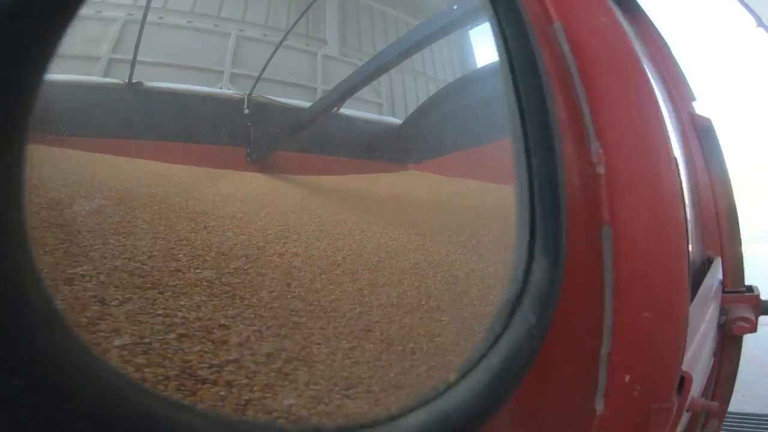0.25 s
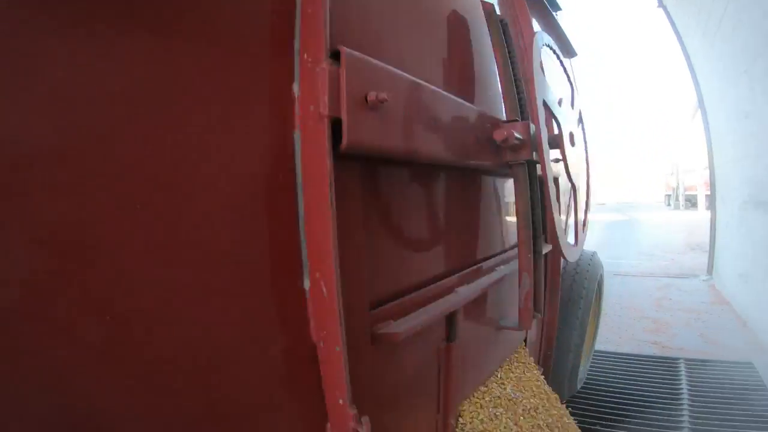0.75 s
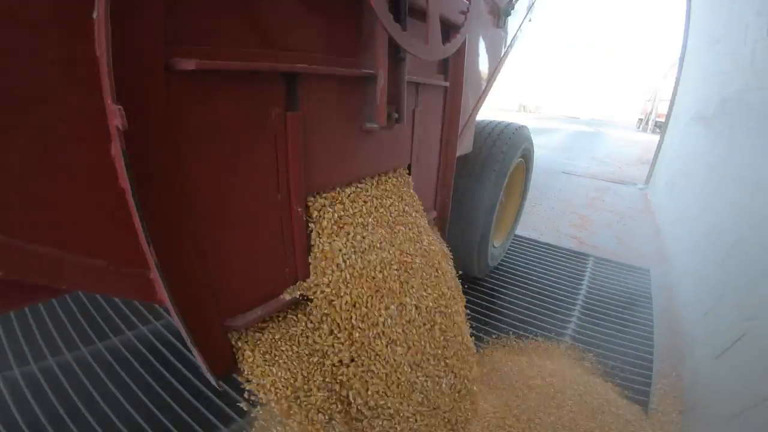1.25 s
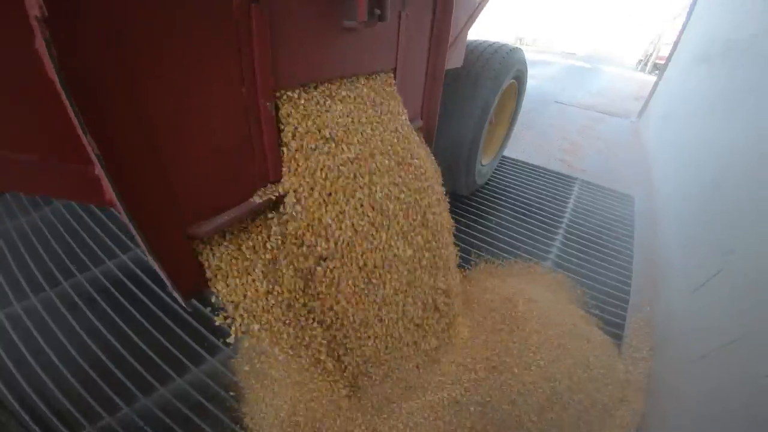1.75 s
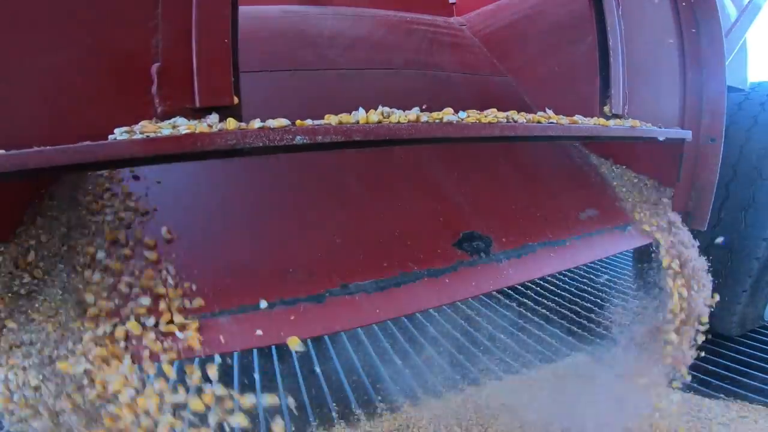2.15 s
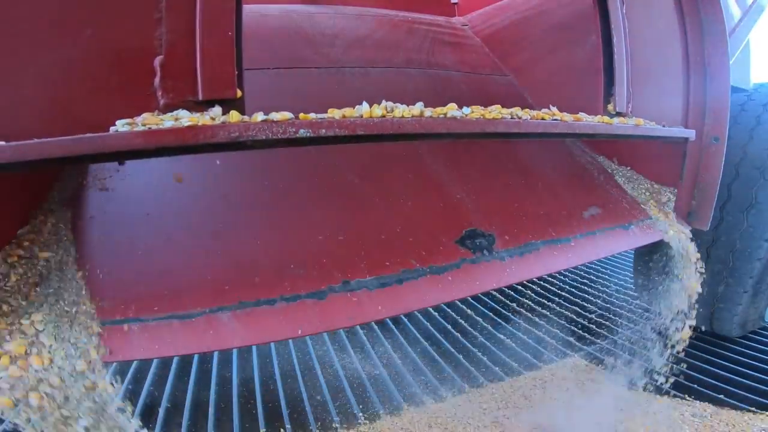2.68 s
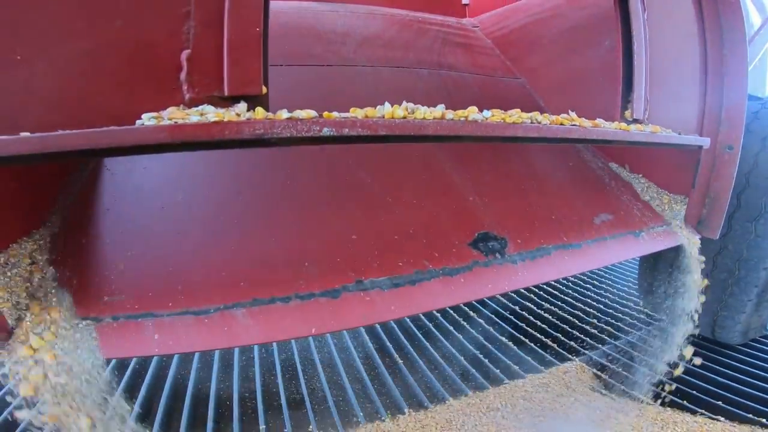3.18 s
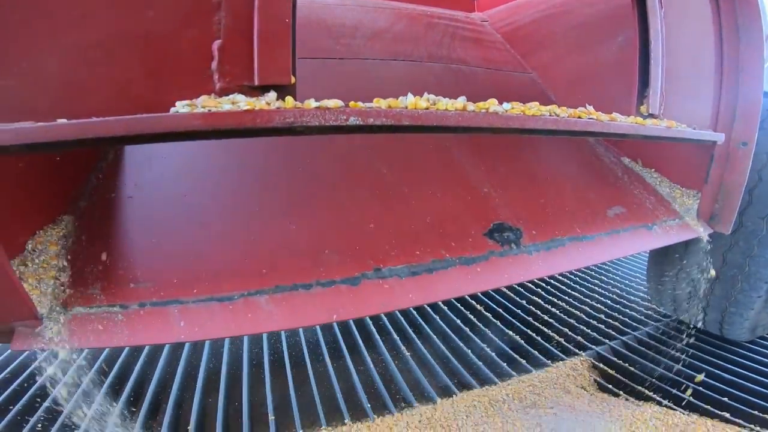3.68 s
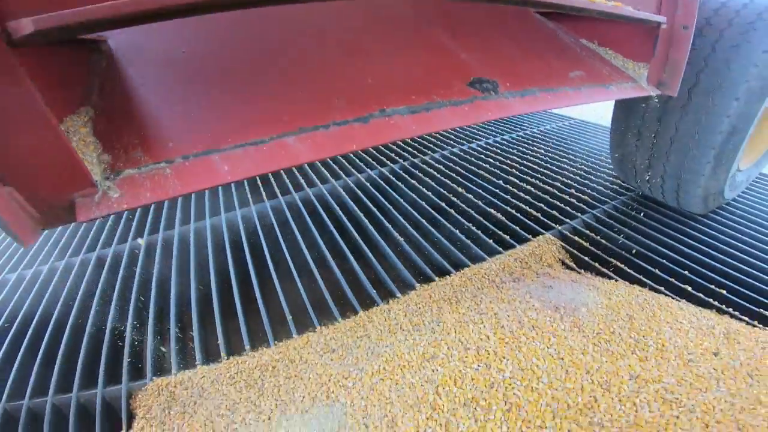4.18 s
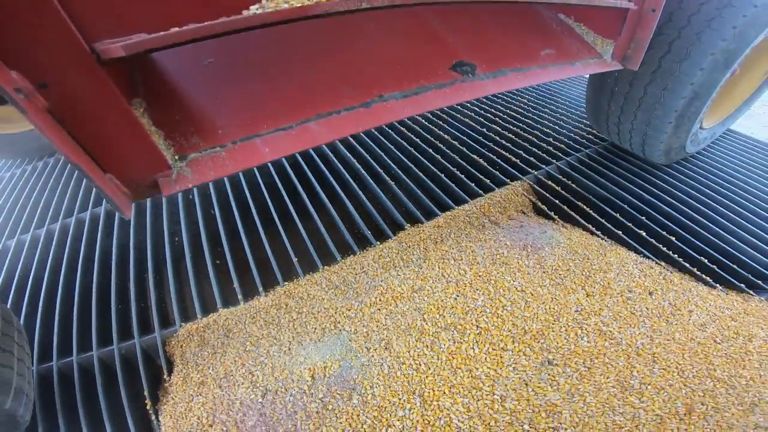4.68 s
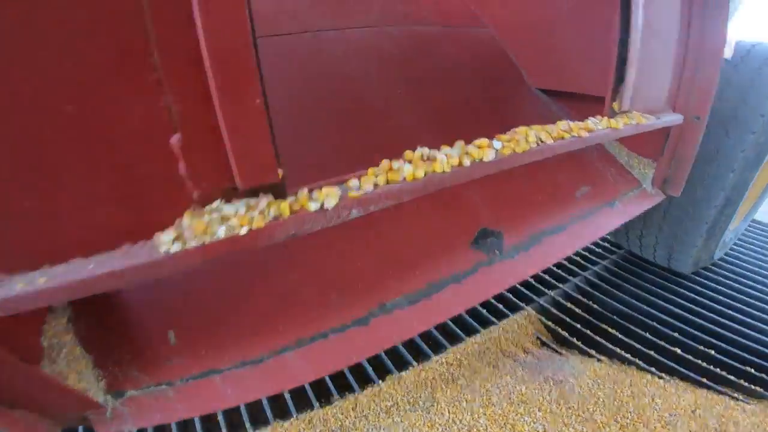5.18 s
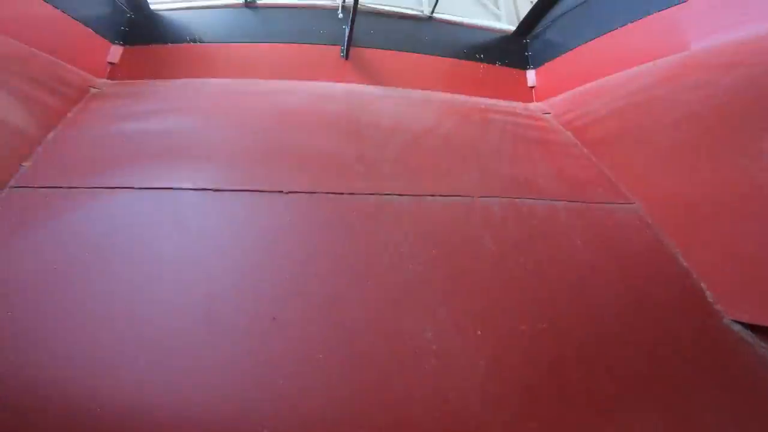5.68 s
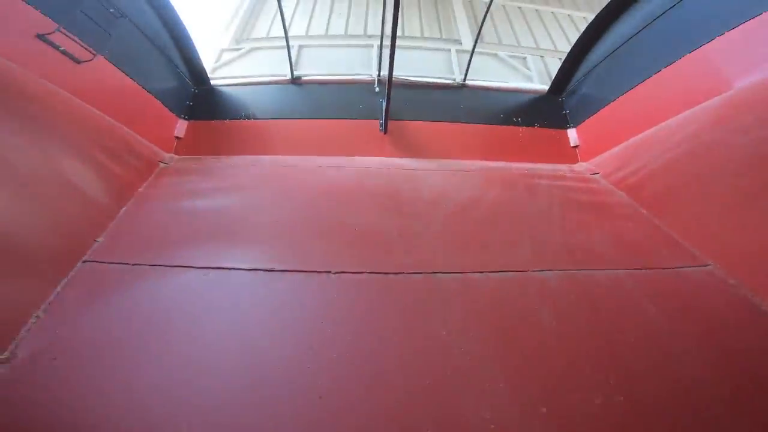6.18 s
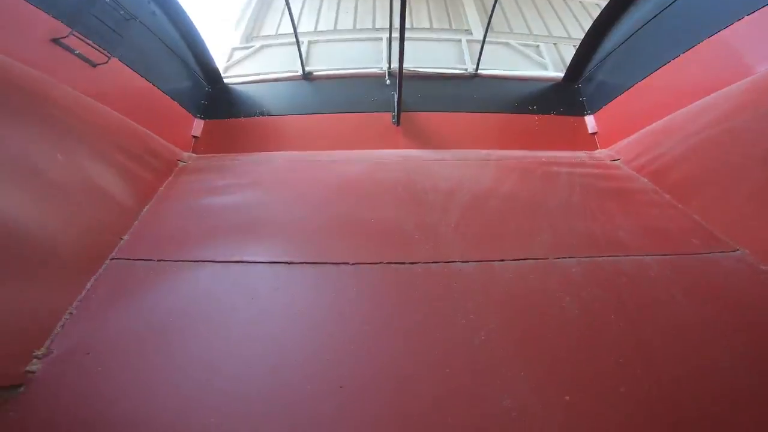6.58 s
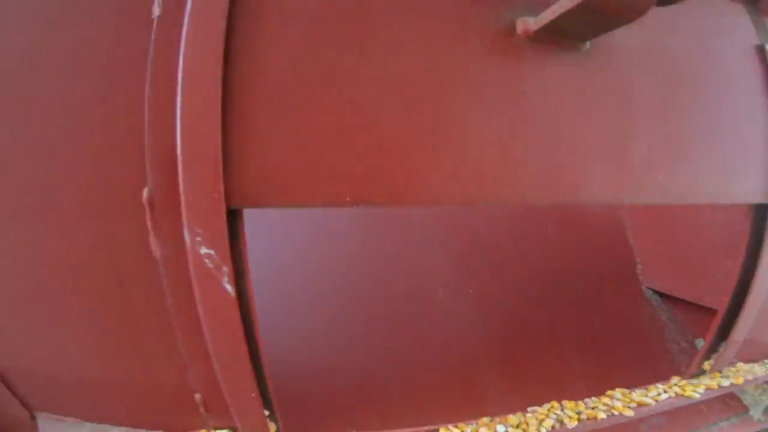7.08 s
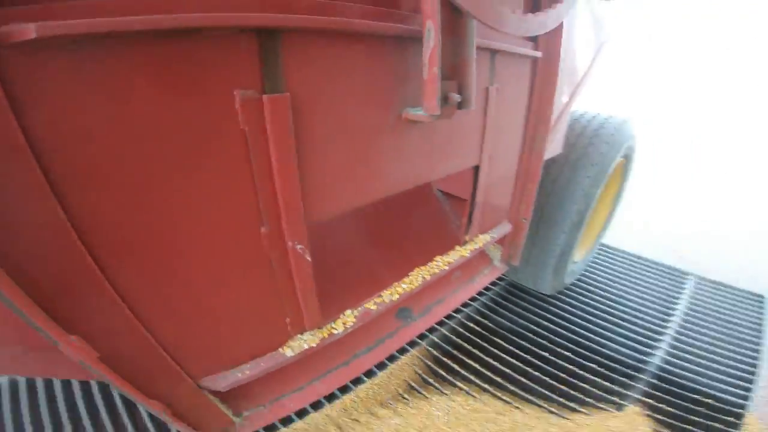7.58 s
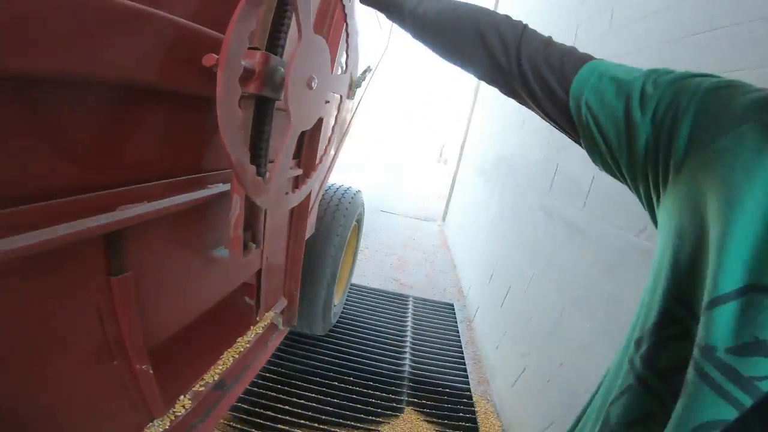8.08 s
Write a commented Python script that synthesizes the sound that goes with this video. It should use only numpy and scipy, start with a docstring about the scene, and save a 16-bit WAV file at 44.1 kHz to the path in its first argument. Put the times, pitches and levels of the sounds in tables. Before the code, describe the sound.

Dense grain rushes and hisses through a floor grate over a loud low conveyor hum, cuts out, returns thin, then cracks and a grinding gate.

```python
"""Grain wagon unloading

Shelled grain pours through a floor grate: dense random taps, coloured into rush, fizz, hiss and a low body.
A conveyor under the pit hums (three sines) and rumbles (shaped noise). After a short hard cut to silence the
pour is thinner under a faint whistle of narrow noise; stray kernels crack and ring the empty hopper, soft
scuffs of noise pass, and the gate grinds as uneven slips and grit excite its resonances.
The sound is mono in the bass and mids and widens in the treble; the loudest peaks clip."""
import sys
import numpy as np
from scipy import signal
from scipy.io import wavfile
from scipy.ndimage import uniform_filter1d

SR = 44100
rng = np.random.default_rng(int(sys.argv[2]) if len(sys.argv) > 2 else 0)


def digitize_waveform(pressure):
    """Quantize a signal to 16-bit integers and store it at the path in sys.argv[1].

    Rows of a 2-D input are taken as channels; values are limited to [-1, 1].
    """
    field = np.atleast_2d(pressure).T
    bounded = np.clip(field, -1, 1)
    quanta = np.round(bounded * 32767).astype(np.int16)
    wavfile.write(sys.argv[1], SR, quanta)


N = 367794
T = np.arange(N) / SR  # s

# Curves in two parts, before and after the cut.
# Conveyor hum where the microphone is, then its rumble and roar: [t/s, level/dB]
HUM_LEVEL = [
    [(0.0, -9), (0.36, -10.5), (0.40, -16), (0.556, -14), (0.64, -6.5), (0.92, -8.5), (0.978, -15.5),
     (1.144, -7), (1.796, -10), (1.87, -17)],
    [(2.12, -9.5), (2.24, -16.5), (2.67, -16), (2.79, -8.5), (3.6, -6.5), (3.97, -9.5), (4.03, -17),
     (4.3, -7.5), (5.32, -8), (5.39, -17), (5.64, -19), (6.52, -19), (7.3, -14), (7.96, -17.5), (8.11, -12),
     (8.34, -20)],
]
RUMBLE_LEVEL = [
    [(0.0, -16), (0.5, -15.5), (0.93, -18.5), (1.68, -19.5)],
    [(2.3, -21.5), (2.65, -22), (2.9, -15.5), (3.78, -16), (4.09, -19.5), (4.58, -16), (5.2, -16),
     (5.42, -22), (5.9, -21), (6.5, -14.5), (6.87, -14.5), (7.2, -18.5), (7.66, -23), (8.1, -22.5)],
]
ROAR_LEVEL = [
    [(0.0, -29), (0.43, -31.5), (0.7, -29.5), (1.68, -31)],
    [(2.3, -38), (2.6, -37), (2.72, -32), (3.4, -33.5), (5.68, -32), (5.93, -29), (6.87, -30), (7.15, -33),
     (7.66, -37), (8.1, -35)],
]
# Grain stream: [t/s, rush level/dB, fizz level/dB]
STREAM_LEVEL = [
    [(0.0, -35, -30), (0.26, -34.5, -29), (0.57, -30.5, -26), (1.15, -28.5, -25.5), (1.4, -28, -28)],
    [(2.3, -41, -46), (2.88, -39.5, -41.5), (3.98, -42, -46), (5.43, -43, -49), (5.93, -36, -48.5),
     (6.19, -40.5, -52.5), (6.94, -41, -50.5), (7.13, -39.5, -57.5), (7.2, -43, -64), (7.92, -46, -61),
     (8.1, -43.5, -58)],
]
# Level of the hiss above about 10 kHz, nearly silent at times: [t/s, level/dB]
HISS_LEVEL = [
    [(0.57, -29.5), (1.39, -33), (1.68, -30)],
    [(2.3, -85.5), (2.88, -74.5), (3.53, -48), (5.03, -52.5), (5.5, -58), (6.0, -54), (7.05, -60.5),
     (7.2, -88)],
]

# Spectral shapes, relative because each is scaled to rms 1 before use.
# Conveyor rumble, boom of pit and wagon, broad roar: [f/Hz, level/dB]
RUMBLE_SHAPE = [(12, -42), (22, -6), (33, .3), (48, -4), (90, -8), (135, -2.5), (157, 5), (174, -7),
                (195, -2.5), (225, -14), (300, -35)]
BOOM_SHAPE = [(170, -25), (240, -1.5), (320, -1.2), (420, -11), (560, -16), (800, -35)]
ROAR_SHAPE = [(250, -33), (450, 3), (1060, -5), (1600, -7.5), (2300, -12), (3000, -21.5), (4000, -48.5)]
# Thick stream drumming on the bars, then rush and fizz of the grain: [f/Hz, level/dB]
BODY_SHAPE = [(700, -20), (1000, 0), (1700, -1), (2600, -5), (3300, -22)]
RUSH_SHAPE = [(2200, -24), (3300, -12), (4000, -2.5), (4800, -.3), (6300, -3), (7000, -13), (8500, -35)]
FIZZ_SHAPE = [(5000, -25), (5600, 2.5), (6300, 8), (7000, .3), (8300, -2.5), (9500, -11.5), (10800, -18.5),
              (11500, -24)]
# Hiss above about 10 kHz: [f/Hz, level/dB]
HISS_SHAPE = [(10300, -31.5), (11200, -16), (12000, 0), (12800, 5), (14200, -2.5), (15850, -12)]
# Hopper sheet, its low ring and its main band: [f/Hz, level/dB]
THUD_SHAPE = [(500, -25), (750, 1.5), (2200, -1.5), (3200, -14)]
SHEET_SHAPE = [(2200, -20), (3200, -9), (4200, -6), (5200, -5), (6200, 6.5), (7500, -3), (10500, -19),
               (11500, -26)]

# Left-right likeness, 1 is mono: [f/Hz, likeness]
LIKENESS = [(7000, 1), (8500, .85), (9500, .65), (11500, 0.22), (15000, .05)]
# Stereo lean, added on the left and taken off on the right: [f/Hz, level/dB]
LEAN_CURVE = [(9000, 0), (11500, -1.6)]
# Kernels and knocks on the hopper sheet: [t/s, level/dB, hardness/dB]
STRIKES = [(5.5294, -37.5, -4), (5.7049, -20, 3), (5.7166, -18, -4), (5.734, -15.5, 2), (5.7494, -19, -4),
           (5.7644, -20, 0), (5.7768, -18.5, 0), (5.8394, -29.5, -6), (5.9557, -19.5, 3), (6.066, -21, 0),
           (6.0994, -29.5, -2), (6.1194, -32.5, 0), (6.184, -44.5, 30), (6.4744, -41.5, 0),
           (7.0124, -41, 0), (8.195, -34, -35)]
# Light scuffs near the microphone: [t/s, level/dB]
SCUFF_PUFFS = [(7.0061, -31), (7.03, -37), (7.15, -39), (7.2535, -38), (7.3149, -37), (7.525, -36.5)]
# Gate resonances, the width being that of one of two passes: [f/Hz, width/Hz, relative level/dB]
PANEL_MODES = [(155, 54, 3.5), (282, 76, 1.5), (438, 58, -10)]
GUIDE_MODES = [(660, 78, -0.5), (1020, 163, -3.5), (1400, 220, -1), (1690, 180, -7), (2400, 450, -19)]
SQUEAL_MODES = [(3900, 600, -8), (4800, 130, -4), (5400, 160, -4), (5100, 930, -4)]

CUT_S, BACK_S, FADE_S = 1.891, 2.012, 0.088  # silence falls, sound returns, fade-in time
EDGE_HZ = 16118  # upper band limit
HUM_HZ = (63.9, 65.3)  # centre pitch before and after the cut
BOOM_DB, BOOM_SHARE, BOOM_REF_DB = -29, 1.1, -18  # the boom follows the rumble level
HOPPER_S, HOPPER_WIDE_S, HOPPER_DB = 6.5, .5, 3  # boom swells while the microphone is inside the hopper
WHISTLE_HZ, WHISTLE_SAG_HZ_PER_S, WHISTLE_END_S = 2730, 45, 3.6
WHISTLE_DB, WHISTLE_FADE_DB_PER_S = -46.5, 4
SCUFF_T60_S = .14
LOW_DB, LOW_PER_HARD, TOP_DB = -6.5, -.4, -23  # soft strikes thud, hard ones tick
CRACK_T60_S, RISE_S = .035, 0.00094
RING_T60_S, RING_SHARE = .28, np.array([[.55], [.6], [.35]])  # ring beside the crack: sheet, low, top
PUSH_S, MOVING_S, FREE_S = 8.12, 8.22, 8.29  # the gate is pushed, moves, then runs free
GROAN_DB, GROAN_RISE_DB, GROAN_FALL_DB_PER_S = -8.8, 15, 280
SCRAPE_DB, SCRAPE_RISE_DB, SCRAPE_GAIN_DB_PER_S = -18.5, 26, 110
SQUEAL_DB, SQUEAL_DB_PER_S = -30, 200  # level at FREE_S and its steady growth
SLIPS_PER_S, SLIPS_SPEEDUP = 155, 2200  # mean rate, and slips per s gained each second once free
BODY_DB, BODY_RISE_DB_PER_S = -37.5, 2  # only while the full stream pours


def gain_of(db):
    """Decibels to a factor."""
    return 10 ** (np.asarray(db) / 20)


def evened(x):
    """Scales to rms 1."""
    return x / np.sqrt(np.mean(x ** 2) + 1e-20)


def read(points, hz):
    """A spectral curve read on a log-frequency axis."""
    f, value = np.transpose(points)
    return np.interp(np.log(hz + 1), np.log(f + 1), value)


def columns(rows, t):
    """The columns of a curve read at the times t."""
    s, *values = np.transpose(rows)
    return [np.interp(t, s, v) for v in values]


def both(tables):
    """Columns of the tables before and after the cut, joined in time."""
    return np.where(T < CUT_S, columns(tables[0], T), columns(tables[1], T))


def drift(top_hz):
    """Slow chance of rms 1: sines of random phase, the slow ones larger."""
    t = T[::128]  # slow enough to draw coarsely
    sines = 0
    for f in np.geomspace(top_hz / 20, top_hz, num=24):
        sines = sines + np.sin(2 * np.pi * (f * t + rng.random())) / np.sqrt(f)
    return np.interp(T, t, evened(sines))


def patter(per_s, spread_db, channels):
    """Random taps of either sign and unequal size, unrelated between channels."""
    chance, size = rng.random((2, channels, N))
    odds = per_s / SR
    taps = np.where(chance < odds, np.sign(chance - odds / 2), 0)
    return evened(taps * gain_of(spread_db * np.minimum(-np.log(size + 1e-9), 4)))


def colour(x, layers, patchy_db, size=512):
    """Gives a white signal a sum of spectra, each on its level curve, with drifting patches.
    A pair of channels is blended by LIKENESS and tilted by LEAN_CURVE."""
    hop = dict(nperseg=size, noverlap=size * 3 // 4)
    hz, t, z = signal.stft(x, SR, **hop)
    power = 0
    for spectrum, db in layers:
        inside = (hz >= spectrum[0][0]) * (hz <= spectrum[-1][0])
        shape = evened(inside * gain_of(read(spectrum, hz)))
        level = gain_of(np.interp(t, T, db + 0 * T))
        power = power + np.outer(shape, level) ** 2
    patches = uniform_filter1d(rng.standard_normal(z.shape[1:]), size=6, axis=0)  # across frequency
    patches = evened(uniform_filter1d(patches, size=14, axis=1))  # across time
    if len(x) == 2:
        same = np.clip(read(LIKENESS, hz), 0, 1)[:, None]
        lean = gain_of(read(LEAN_CURVE, hz))[:, None]
        right = same * z[0] + np.sqrt(1 - same ** 2) * z[1]
        z = np.array([z[0] * lean, right / lean])
    z = z * (np.sqrt(power) * gain_of(patchy_db * patches))
    return signal.istft(z, SR, **hop)[1][:, :x.shape[1]]


def resonate(x, hz, width):
    """Shifts the curve hz down to zero, smooths, and shifts back: a resonance of gain 1."""
    turn = np.exp(2j * np.pi * np.cumsum(hz * np.ones(len(x))) / SR)
    r = np.exp(-np.pi * width / SR)
    return 2 * (turn * signal.lfilter([1 - r], [1, -r], x / turn)).real


def ring_modes(x, modes):
    """Rings a set of resonances, each passed twice, and scales their mix to rms 1."""
    mix = 0
    for hz, width, db in modes:
        mix = mix + gain_of(db) * evened(resonate(resonate(x, hz, width), hz, width))
    return evened(mix)


def conveyor():
    """A wavering hum with its half and third orders, over rumble in the pit and a broad roar."""
    (hum_db,), (rumble_db,), (roar_db,) = both(HUM_LEVEL), both(RUMBLE_LEVEL), both(ROAR_LEVEL)
    hopper_swell = HOPPER_DB * np.exp(-((T - HOPPER_S) / HOPPER_WIDE_S) ** 2)
    boom_db = BOOM_DB + BOOM_SHARE * (rumble_db - BOOM_REF_DB) + hopper_swell

    hz = np.where(T < CUT_S, *HUM_HZ) + 0.81 * drift(top_hz=12)
    phase = 2 * np.pi * np.cumsum(hz) / SR
    half_order = gain_of(-21 + 3 * drift(top_hz=9)) * np.sin(phase / 2)
    third_order = gain_of(-22.5) * np.sin(3 * phase)
    orders = np.sin(phase) + half_order + third_order
    hum = np.sqrt(2) * gain_of(hum_db + 1.2 * drift(top_hz=14)) * orders

    shake_db = drift(top_hz=16)  # load changes shake the whole frame
    low_layers = [(RUMBLE_SHAPE, rumble_db), (BOOM_SHAPE, boom_db)]
    rumble = colour(rng.standard_normal((1, N)), low_layers, patchy_db=1.1, size=4096)
    taps = patter(per_s=9000, spread_db=2.5, channels=1)
    roar = colour(taps, [(ROAR_SHAPE, roar_db + 0.65 * shake_db)], patchy_db=1.0)
    return hum + gain_of(1.2 * shake_db) * rumble + roar


def whistle():
    """A thin fuzzy whistle that sags and fades: noise in a narrow resonance."""
    t = T[(T > CUT_S) & (T < WHISTLE_END_S)]
    hz = WHISTLE_HZ - WHISTLE_SAG_HZ_PER_S * (t - BACK_S)
    tone = resonate(resonate(rng.standard_normal(len(t)), hz, 120), hz, 120)
    start = round(t[0] * SR)
    db = WHISTLE_DB - WHISTLE_FADE_DB_PER_S * (t - BACK_S)
    return np.pad(gain_of(db) * evened(tone), (start, N - start - len(t)))


def scuffs():
    """Short puffs of gritty noise, each starting at once and dying away."""
    start = int(SCUFF_PUFFS[0][0]) * SR
    t, power = T[start:], 0
    for s, db in SCUFF_PUFFS:
        fall_db = 60 * np.maximum(t - s, 0) / SCUFF_T60_S
        power = power + (t > s) * gain_of(db - fall_db) ** 2
    grit = colour(rng.standard_normal((1, len(t))), [(RUSH_SHAPE, 0)], patchy_db=1.5, size=256)
    return np.pad(np.sqrt(power) * grit[0], (start, 0))


def kernels():
    """Each strike is a sharp crack and a short ring of the hopper sheet, in three bands of noise."""
    start = int(STRIKES[0][0]) * SR
    noise = rng.standard_normal((2, N - start))
    shapes = (SHEET_SHAPE, THUD_SHAPE, HISS_SHAPE)
    bands = [colour(noise, [(shape, 0)], patchy_db=1.3, size=256) for shape in shapes]
    power, age = np.zeros((3, N)), T[:SR // 2]
    crack = gain_of(-60 * age / CRACK_T60_S)
    tail = RING_SHARE * gain_of(-60 * age / RING_T60_S)
    envelope = (1 - np.exp(-age / RISE_S)) * (crack + tail)
    for s, db, hard_db in STRIKES:
        part = power[:, round(s * SR):][:, :len(age)]
        levels = gain_of([[db], [db + LOW_DB + LOW_PER_HARD * hard_db], [db + TOP_DB + hard_db]])
        part += ((levels * envelope) ** 2)[:, :part.shape[1]]
    struck = sum(np.sqrt(p[start:]) * band for p, band in zip(power, bands))
    return np.pad(struck, ((0, 0), (start, 0)))


def gate():
    """Uneven slips with grit between them ring the panel and the guides; grit alone rings the squeal."""
    t = T[T >= PUSH_S]
    stuck = np.clip((MOVING_S - t) / (MOVING_S - PUSH_S), 0, 1)
    free = np.maximum(t - FREE_S, 0)  # s since it ran free
    groan_db = GROAN_DB - GROAN_RISE_DB * stuck - GROAN_FALL_DB_PER_S * free
    scrape_db = SCRAPE_DB - SCRAPE_RISE_DB * stuck + SCRAPE_GAIN_DB_PER_S * free
    squeal_db = SQUEAL_DB + SQUEAL_DB_PER_S * (t - FREE_S)

    per_s = SLIPS_PER_S + SLIPS_SPEEDUP * free
    unevenness = evened(uniform_filter1d(rng.standard_normal(len(t)), size=300))
    turns = np.cumsum(per_s * (1 + 0.28 * unevenness)) / SR
    slips = evened(np.diff(np.floor(turns), prepend=0))  # one click per whole turn
    grit = rng.standard_normal(len(t))

    out = gain_of(groan_db) * ring_modes(slips + .2 * grit, PANEL_MODES)
    out += gain_of(scrape_db) * ring_modes(slips + .6 * grit, GUIDE_MODES)
    out += gain_of(squeal_db) * ring_modes(grit, SQUEAL_MODES)
    return np.pad(out * np.clip((t - t[0]) / .04, 0, 1), (N - len(t), 0))


def stream():
    """Countless kernels tick on the bars and on each other; one surge moves rush, fizz and hiss."""
    levels = np.vstack([both(STREAM_LEVEL), both(HISS_LEVEL)])
    rush_db, fizz_db, hiss_db = levels + 0.44 * drift(top_hz=23.98)
    body_db = np.where(T < CUT_S, BODY_DB + BODY_RISE_DB_PER_S * T, -120)
    layers = [(RUSH_SHAPE, rush_db), (FIZZ_SHAPE, fizz_db), (HISS_SHAPE, hiss_db), (BODY_SHAPE, body_db)]
    return colour(patter(per_s=14000, spread_db=2.0, channels=2), layers, patchy_db=1.55)


def scene():
    """Everything in the shed, from the background to the pouring grain."""
    return conveyor() + whistle() + scuffs() + kernels() + gate() + stream()


def record(dry):
    """A hard cut to silence and a fade back in; peaks clip; then the band limit."""
    fade = np.clip((CUT_S - T) / .0008, 0, 1) + np.clip((T - BACK_S) / FADE_S, 0, 1) ** 2.3
    clipped = np.clip(dry * fade, -.99, .99)
    lowpass = signal.firwin(511, EDGE_HZ, window=("kaiser", 9), fs=SR)
    return signal.oaconvolve(clipped, lowpass[None], "same")


dry = scene()
out = record(dry)
digitize_waveform(out)
```